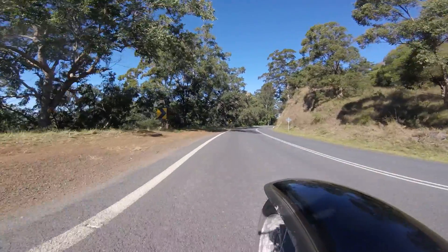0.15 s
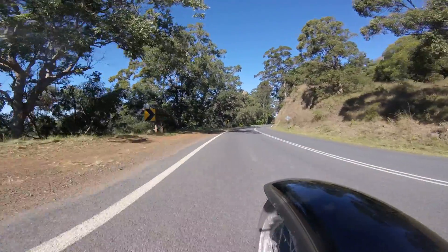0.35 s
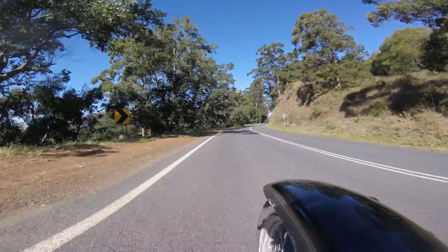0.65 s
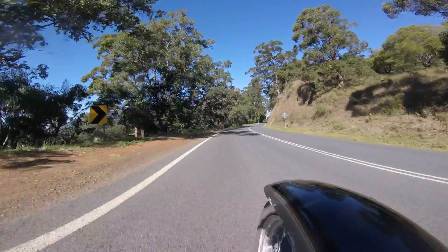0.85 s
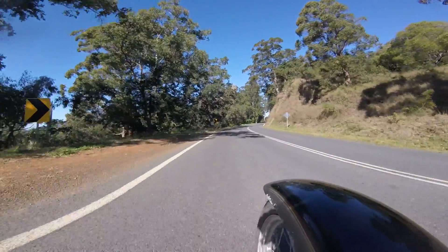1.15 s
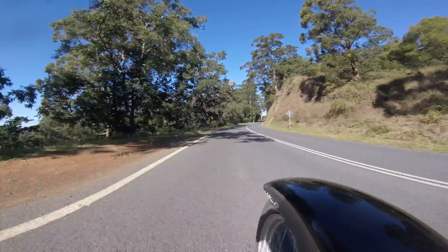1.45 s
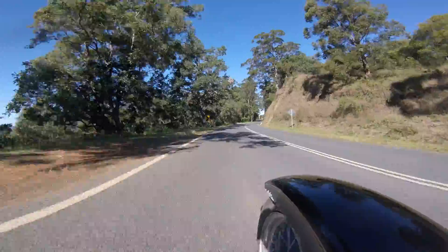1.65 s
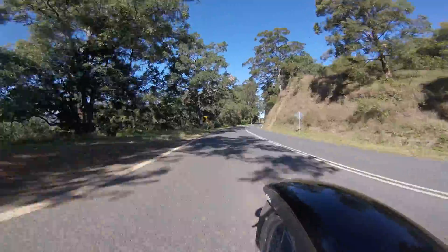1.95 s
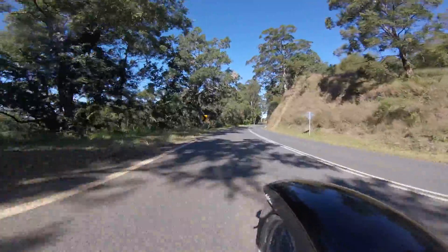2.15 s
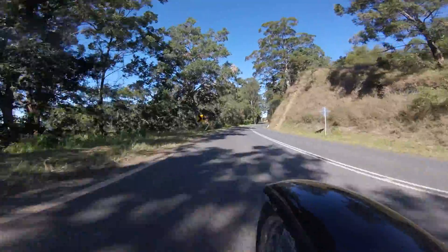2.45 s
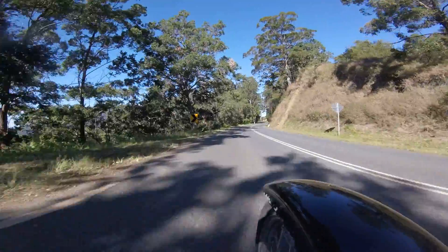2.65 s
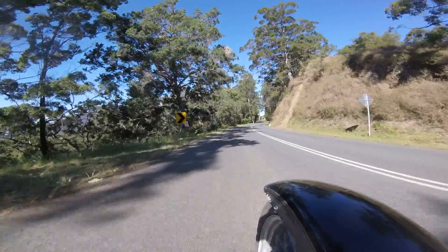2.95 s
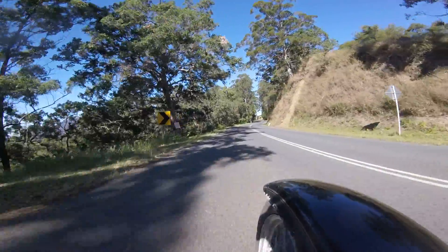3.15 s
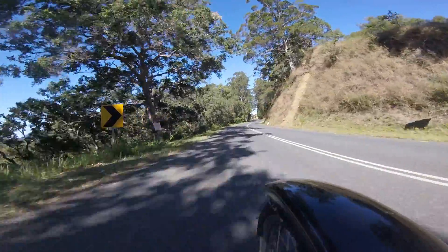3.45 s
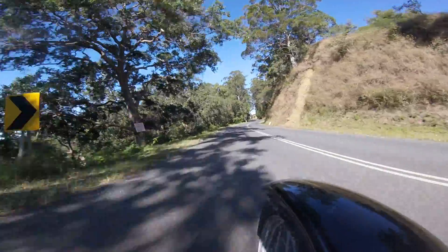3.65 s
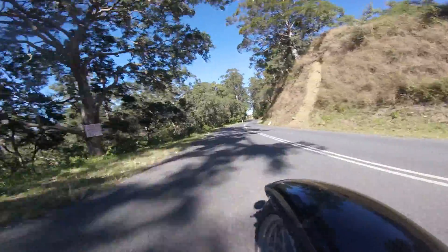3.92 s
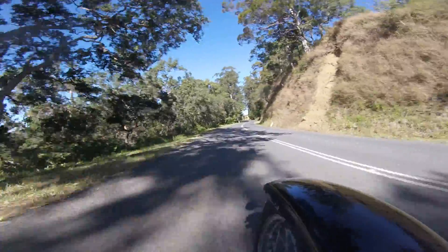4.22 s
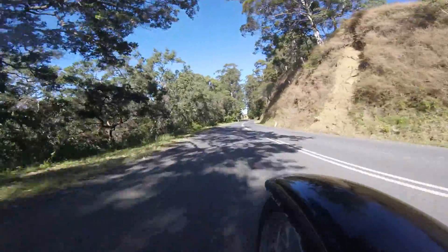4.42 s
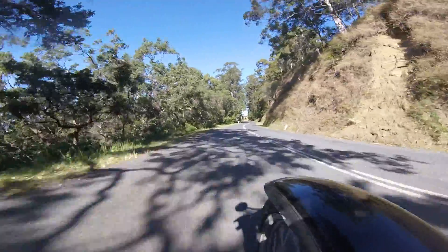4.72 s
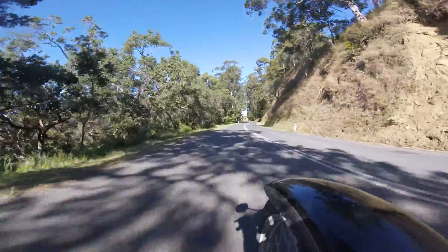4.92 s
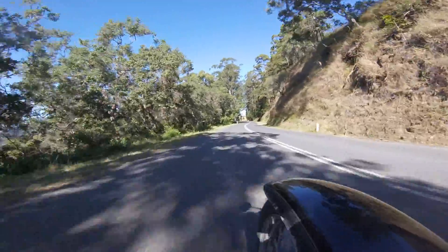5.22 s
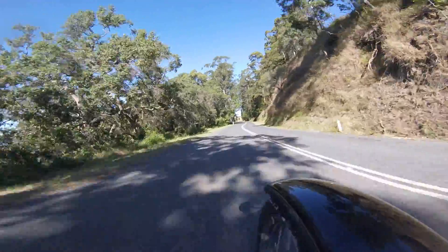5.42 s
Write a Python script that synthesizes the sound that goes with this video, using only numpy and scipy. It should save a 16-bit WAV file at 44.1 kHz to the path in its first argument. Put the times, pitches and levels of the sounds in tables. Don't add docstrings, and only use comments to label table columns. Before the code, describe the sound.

Throaty motorcycle engine climbs, drops for two gear changes and climbs again, with buzzing metallic rattle, wind buffeting and road hiss, heard close on the bike.

```python
import sys
import numpy as np
from scipy import signal
from scipy.fft import rfft, irfft, next_fast_len
from scipy.io import wavfile

SR = 44100
rng = np.random.default_rng(int(sys.argv[2]) if len(sys.argv) > 2 else 0)


def gain_from_decibels(decibels):
    exponent = np.asarray(decibels, float) / 20
    return 10 ** exponent


def unload_wav(signal):
    wavfile.write(
        sys.argv[1],
        SR,
        np.round(np.clip(np.atleast_2d(signal).T, -1, 1) * 32767).astype(np.int16),
    )


N = 246078
TIME = np.arange(N) / SR
SILENCE = 1e-18


def rms_one(x):
    return x / np.sqrt(np.mean(x ** 2) + 1e-20)


def in_time(rows):
    s, *columns = np.transpose(rows)
    return [np.interp(TIME, s, c) for c in columns]


def drift(rate_hz):
    hop, settle = 20, 4000
    knots = rng.standard_normal(N // hop + settle)
    r = np.exp(-2 * np.pi * rate_hz * hop / SR)
    slow = signal.lfilter([1], [1, -2 * r, r * r], knots)[settle - 1:]
    return np.interp(np.arange(N) / hop, np.arange(N // hop + 1), rms_one(slow))


def coloured(spectrum, source=None):
    size = next_fast_len(N)
    hz, level_db = np.transpose(spectrum)
    bins_hz = np.arange(size // 2 + 1) * SR / size
    shape = gain_from_decibels(np.interp(np.log(bins_hz + 1), np.log(hz), level_db, left=-90, right=-90))
    if source is None:
        source = rng.standard_normal(N)
    return irfft(rfft(source, size) * rms_one(shape), size)[:N]


def resonance(x, hz, width_hz):
    r = np.exp(-np.pi * width_hz / SR)
    zeros = np.array([1, 0, -1]) * (1 - r * r) / 2
    return signal.lfilter(zeros, [1, -2 * r * np.cos(2 * np.pi * hz / SR), r * r], x)


def orders(turns, table, flutter_db, waver):
    out = np.zeros(N)
    for multiple, start, end, db in table:
        swell = np.clip(np.minimum(TIME - start, end - TIME) / 0.11, 0, 1)
        level = gain_from_decibels(db + flutter_db * drift(4.3))
        out += swell * level * np.sin(2 * np.pi * multiple * turns + waver * drift(10))
    return out


def follow(effort_db, shake_db, start_db, by_effort, by_shake, loss_db_per_s):
    return start_db + by_effort * effort_db + by_shake * shake_db - loss_db_per_s * TIME


def airstream(turns, effort_db, shake_db):
    # frequency in Hz, density in dB per Hz.
    buffet_spectrum = [(15, -8.5), (40, -3.5), (70, -6.5), (120, -9), (250, -12.5), (500, -11), (800, -37)]
    # frequency in Hz, density in dB per Hz.
    rush_spectrum = [(300, -26.5), (550, 1), (700, -3), (800, -7.5), (1000, -9.5), (1450, -17.5),
                     (1750, -13), (2100, -14), (3200, -23.5), (4500, -31.5), (6000, -55.5)]
    # frequency in Hz, density in dB per Hz.
    hiss_spectrum = [(1500, 5.5), (2600, -0.5), (3800, -3.5), (4700, 3), (5400, 4.5), (7500, -7),
                     (8600, -17), (9500, -23.5), (13000, -40)]
    buffet_db = follow(effort_db, shake_db, start_db=-31, by_effort=0.37, by_shake=-0.56, loss_db_per_s=-0.65)
    rush_db = follow(effort_db, shake_db, start_db=-35.5, by_effort=0.6, by_shake=0.53, loss_db_per_s=0.43)
    hiss_db = follow(effort_db, shake_db, start_db=-45, by_effort=0.82, by_shake=0.35, loss_db_per_s=2.5)
    throb = np.cos(np.pi * turns) + 0.6 * np.cos(2 * np.pi * turns)
    gust = drift(6.9)
    buffet = gain_from_decibels(buffet_db + 4.0 + 1.1 * drift(16)) * coloured(buffet_spectrum)
    rush = gain_from_decibels(rush_db + 0.5 * throb + 0.8 * gust + 0.64 * drift(60)) * coloured(rush_spectrum)
    hiss = gain_from_decibels(hiss_db + 0.31 * throb + 0.65 * gust + 3.0 * drift(140)) * coloured(hiss_spectrum)
    return buffet + rush + hiss


def leak(effort_db, shake_db):
    # frequency in Hz, density in dB per Hz.
    leak_spectrum = [(4500, -15.5), (5900, 20), (6300, 21), (6480, 31.5), (6700, 17), (8800, 7),
                     (9400, 2.5), (11000, -5), (13000, -13)]
    leak_db = follow(effort_db, shake_db, start_db=-62.5, by_effort=0.8, by_shake=2.78, loss_db_per_s=6)
    return gain_from_decibels(leak_db + 14.0 + 0.53 * drift(30)) * coloured(leak_spectrum)


def clunks():
    # time in seconds, peak in dB.
    shifts = [
        (1.613, -30),
        (1.689, -37),
        (4.472, -33),
    ]
    # frequency in Hz, width in Hz, level in dB.
    casing = [(1260, 51, 3), (1680, 53, -8), (1950, 260, -7)]
    blows = np.full(N, SILENCE)
    for s, db in shifts:
        blows[int(s * SR)] = gain_from_decibels(db + 21)
    fade = np.exp(-1 / (0.0061 * SR))
    drive = signal.lfilter([1], [1, -fade], blows) * rng.standard_normal(N)
    rung = sum(gain_from_decibels(db) * resonance(drive, hz, width) for hz, width, db in casing)
    return signal.sosfilt(signal.butter(4, 3000, fs=SR, output="sos"), rung)


def chain():
    # frequency in Hz, start in seconds, end in seconds, level in dB.
    chain_tone = [(1770, 1.8, 2.4, -54)]
    return orders(TIME, chain_tone, flutter_db=3, waver=4)


def whine(turns):
    # multiple of the firing rate, start in seconds, end in seconds, level in dB.
    tooth_tones = [
        (17.3, .1, 1.1, -48),
        (20.8, .05, 1.15, -49),
        (24.4, .2, .65, -46.5),
        (21.5, 2.55, 3.5, -48),
        (16.9, 2.4, 3.0, -54),
        (21.6, 5.0, 5.7, -53),
        (11.7, 5.05, 5.7, -47),
    ]
    return gain_from_decibels(4.0 * np.cos(np.pi * turns)) * orders(turns, tooth_tones, flutter_db=2.2, waver=.6)


def shudder(turns):
    # multiple of the firing rate, start in seconds, end in seconds, level in dB.
    shudder_tones = [
        (1.5, -.2, .5, -22),
        (2.5, -.2, .7, -24),
        (3, 1.0, 1.75, -27),
        (3, 3.5, 4.45, -27),
        (3.5, 3.8, 4.4, -25),
    ]
    return orders(turns, shudder_tones, flutter_db=.6, waver=.1)


def rattle(turns, per_s, effort_db):
    # time in seconds, peak in dB.
    knocks = [(0.9193, -25.5), (0.9682, -25), (0.9895, -32), (1.033, -25), (1.056, -32), (1.0822, -35),
              (1.101, -24), (1.1466, -30.5), (1.2588, -20), (1.3239, -19), (1.357, -21.5), (1.3867, -20),
              (1.4498, -22), (1.479, -24.5), (1.5527, -24.5), (2.9465, -27.5), (3.4418, -27),
              (3.6549, -30.5), (3.839, -22.5), (3.8713, -23), (3.9005, -22.5), (3.936, -27.5),
              (3.9531, -24.5), (4.0707, -25), (4.098, -29), (4.12, -20.5), (4.139, -33.5), (4.211, -27),
              (4.2506, -30.5), (4.2706, -22)]
    mount_lag = [(86, .08), (90, .15), (93, .36), (96, .52), (100, .64)]
    # frequency in Hz, density in dB per Hz.
    clack = [(500, -4.5), (1200, 7.5), (2200, 6), (3500, 1.5), (4700, 9), (7500, -2), (8600, -15.5),
             (9500, -37), (12000, -49)]
    landing = turns - np.interp(per_s, *np.transpose(mount_lag))
    ticks = np.flatnonzero(np.diff(np.floor(landing)))
    luck = rng.standard_normal((len(ticks), 2))
    at_s, speed = TIME[ticks], per_s[ticks]
    tick_db = -23 + 7 * np.minimum(speed - 88.9, 0) - 1.33 * at_s
    tick = gain_from_decibels(tick_db + 3 * luck[:, 0])
    chatter_db = -36.5 - 7.5 * at_s + 0.9 * (speed - 88.5) + effort_db[ticks]
    chatter = gain_from_decibels(chatter_db + 4 * luck[:, 1])
    s, peak_db = np.transpose(knocks)
    free = np.abs(at_s[:, None] - s).min(axis=1) > .004
    clicks = np.full(N, SILENCE)
    clicks[ticks] += free * (tick + chatter * (np.arange(len(ticks)) % 2))
    clicks[(s * SR).astype(int)] += gain_from_decibels(peak_db + 3.5)
    decay_s, rise_s = 0.0013, 0.00027
    fade, rise = np.exp(-1 / (decay_s * SR)), np.exp(-1 / (rise_s * SR))
    envelope = signal.lfilter([1 - rise], np.convolve([1, -fade], [1, -rise]), clicks)
    scatter = envelope * rng.standard_normal(N)
    return coloured(clack, scatter + 1.2 * clicks)


def frame_levels(per_s, effort_db):
    # firings per second, first order in dB, second order in dB.
    frame_gain = [(66, -30.5, -34), (69, -28, -40), (76.4, -36, -34.5), (78.8, -27, -32),
                  (84.6, -21, -24.5), (87.8, -27, -26), (89.1, -17.5, -29.5), (92.4, -14.5, -26.5),
                  (100.8, -16.5, -22)]
    rate, first_db, second_db = np.transpose(frame_gain)
    lug_db = 9.5 * np.exp(-(TIME / 0.64) ** 2)
    boom_db = np.interp(per_s, rate, first_db) + 0.15 * effort_db + lug_db + 0.15 * (TIME - 2.5)
    second_db = np.interp(per_s, rate, second_db) + 0.2 * effort_db
    shake_db = np.maximum(boom_db - lug_db + 17, 0)
    return boom_db, second_db, shake_db


def boom(turns, per_s, boom_db, second_db):
    frame_lead = [(64, -.14), (75, -.12), (80, 0), (87, .08), (94, .03), (100, -.12)]
    swing = turns + np.interp(per_s, *np.transpose(frame_lead))
    first = gain_from_decibels(boom_db + 4 + 1.3 * drift(2)) * np.cos(2 * np.pi * swing)
    second = gain_from_decibels(second_db + 3 + 1.2 * drift(5)) * np.cos(4 * np.pi * (turns - .15))
    return first + second


def exhaust(turns, pulse_db):
    # frequency in Hz, width in Hz, level in dB.
    pipe = [(365, 7.1, 8), (303.3, 169, 6.5), (411.4, 152, 8), (535, 93, -1), (542, 50, -2.5),
            (717, 45, -32), (186, 21, -12)]
    # time in seconds, roughness 0-1.
    roughness = [(0, .16), (.5, .12), (.7, .04), (1.5, .04), (1.8, .1), (2.05, .12), (2.7, .1), (3.6, .05),
                 (4.25, .04), (4.6, .2), (4.95, .22), (5.2, .1)]
    # time in seconds, level in dB relative to the first.
    weak_cylinder = [(0, -4), (.45, -7.5), (.7, -11), (1.2, -9), (2.0, -5), (3.3, -12), (3.8, -3.5),
                     (4.6, -10), (5.58, -14)]
    rough, = in_time(roughness)
    weak_db, = in_time(weak_cylinder)
    count = np.arange(1, int(turns[-1]))
    weak = count % 2
    luck = rng.standard_normal((len(count), 2))
    firing_turns = count - .3 + 0.051 * weak + .008 * luck[:, 0]
    at = np.interp(firing_turns, turns, np.arange(N)).astype(int)
    clicks = np.full(N, SILENCE)
    clicks[at] = gain_from_decibels(weak_db[at] * weak + 2.0 * luck[:, 1])
    fade = np.exp(-1 / (0.036 * SR))
    puffs = signal.lfilter([1], [1, -fade], clicks) * rng.standard_normal(N)
    drive = np.sqrt(1 - rough) * rms_one(clicks) + np.sqrt(rough) * rms_one(puffs)
    rung = np.zeros(N)
    for k, (hz, width, db) in enumerate(pipe):
        rung += (-1) ** k * gain_from_decibels(db) * resonance(drive, hz, width)
    silencer = signal.butter(3, [150, 700], "band", fs=SR, output="sos")
    return gain_from_decibels(pulse_db - .6) * rms_one(signal.sosfilt(silencer, rung))


def housing(x):
    # frequency in Hz, width in Hz, gain in dB.
    case_modes = [(5910, 1540, -19), (6460, 110, 6.5)]
    for hz, width, db in case_modes:
        x = x + (gain_from_decibels(db) - 1) * resonance(x, hz, width)
    return x


def scene():
    # time in seconds, firings per second.
    revs = [(0, 63.6), (.48, 73.3), (1.0, 87.1), (1.49, 99.4), (1.6, 91.0), (1.76, 80.6), (1.92, 71.2),
            (2.04, 66.3), (2.8, 78.6), (3.28, 86.2), (3.44, 88.3), (4.26, 101.3), (4.4, 90.6), (4.56, 81),
            (4.66, 77), (4.73, 79), (4.9, 76), (5.58, 82.1)]
    # time in seconds, level in dB.
    effort = [(0, -21), (.1, -16), (.68, -16.5), (.92, -20), (1.1, -17.5), (1.6, -23), (1.72, -30.5),
              (1.95, -28.5), (2.15, -25), (2.6, -20.5), (2.8, -17), (3.2, -19.5), (3.65, -17), (3.85, -21),
              (4.25, -17), (4.55, -29.5), (5.0, -22.5), (5.58, -19.5)]
    per_s, = in_time(revs)
    turns = .3 + np.cumsum(per_s) / SR
    pulse_db, = in_time(effort)
    effort_db = pulse_db + 22
    boom_db, second_db, shake_db = frame_levels(per_s, effort_db)
    air = airstream(turns, effort_db, shake_db)
    gears = clunks() + chain() + whine(turns) + shudder(turns)
    shaken = rattle(turns, per_s, effort_db)
    engine = boom(turns, per_s, boom_db, second_db) + exhaust(turns, pulse_db)
    return (housing(air + gears + shaken + engine) + leak(effort_db, shake_db))[None]


def top_cut(x):
    return signal.sosfilt(signal.butter(12, 13000, fs=SR, output="sos"), x)


def record(dry):
    mix = 0.79 * np.tanh(dry / 0.85)
    return top_cut(mix)


dry = scene()
out = record(dry)
unload_wav(out)
```